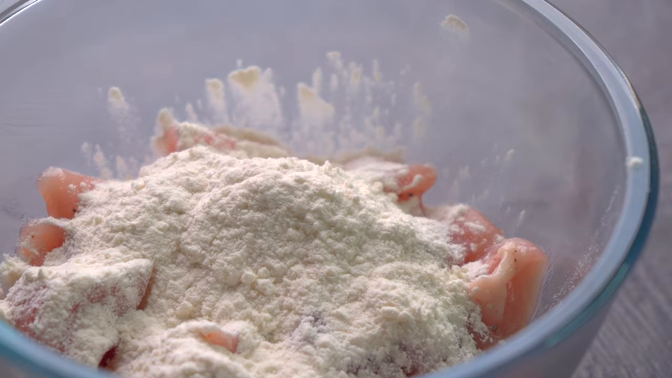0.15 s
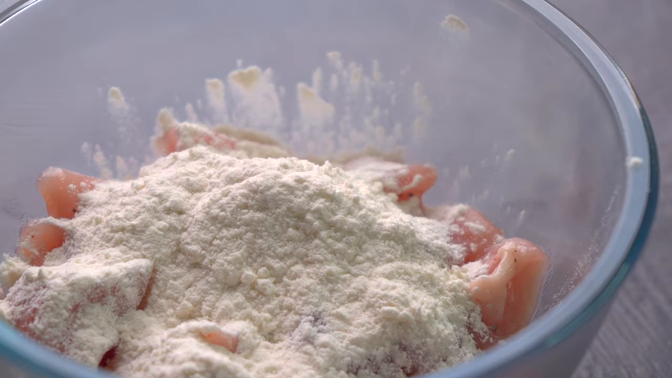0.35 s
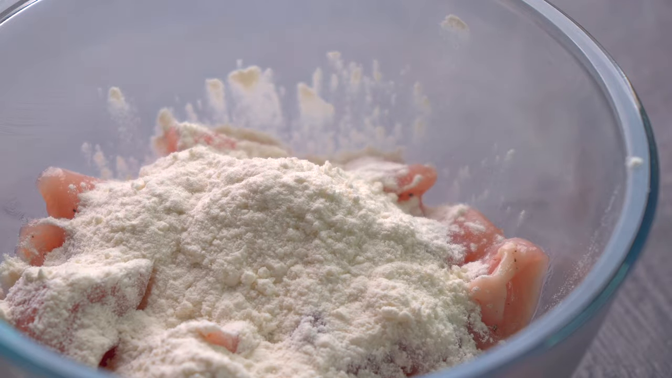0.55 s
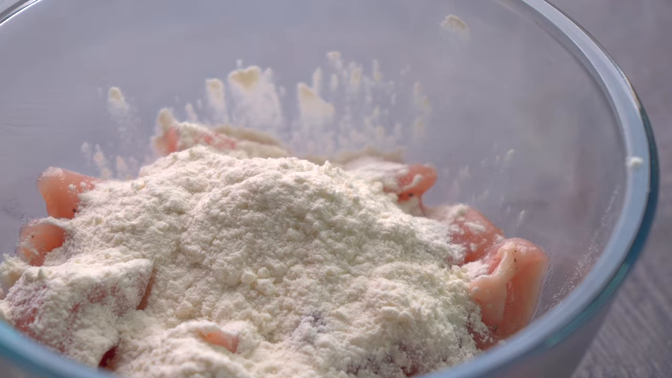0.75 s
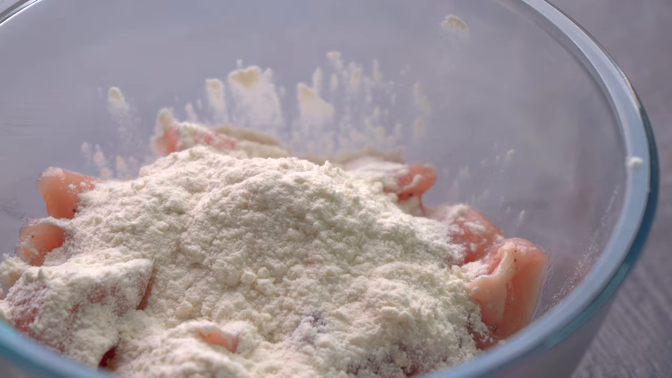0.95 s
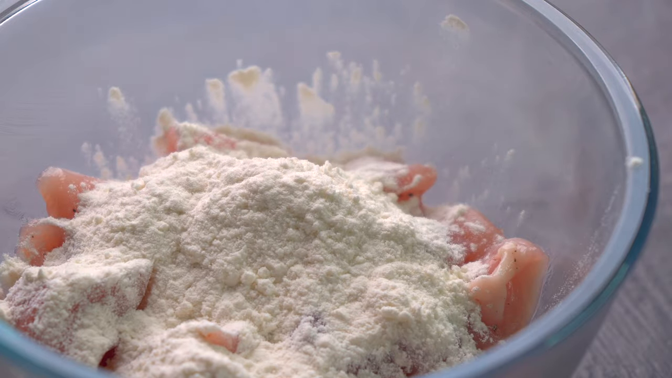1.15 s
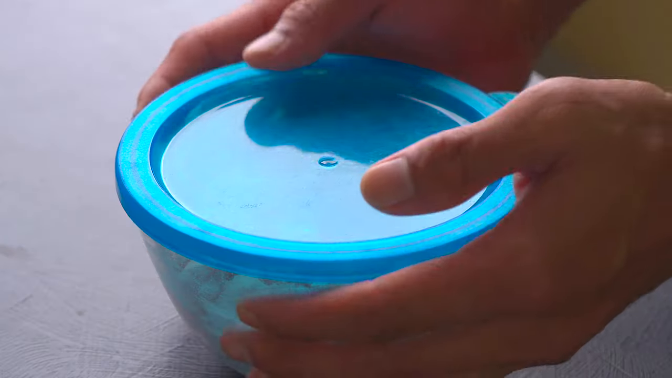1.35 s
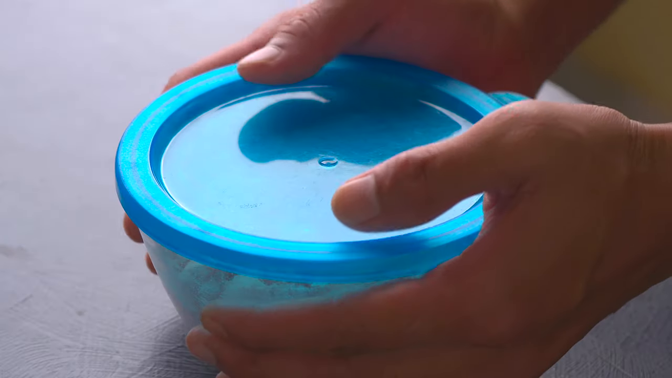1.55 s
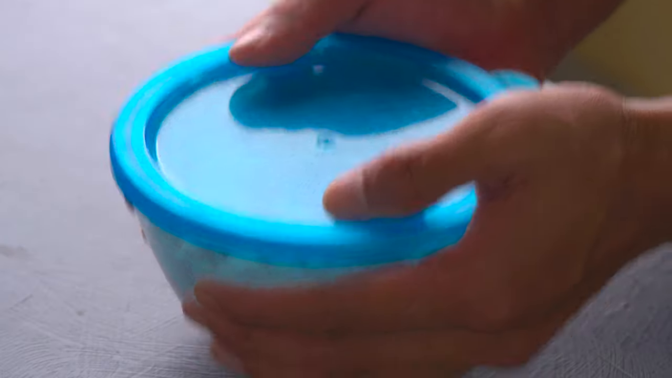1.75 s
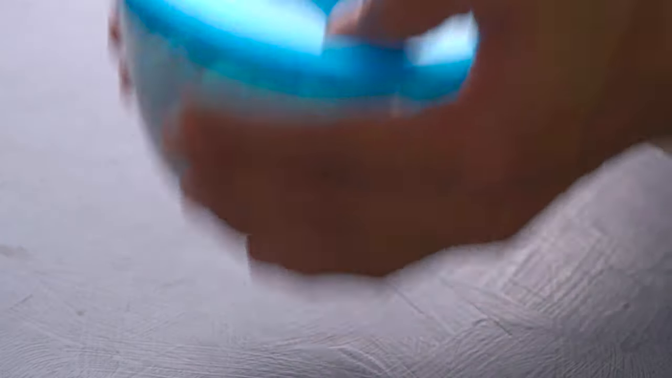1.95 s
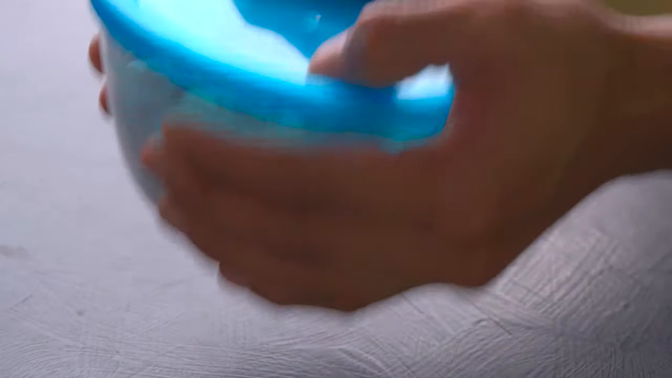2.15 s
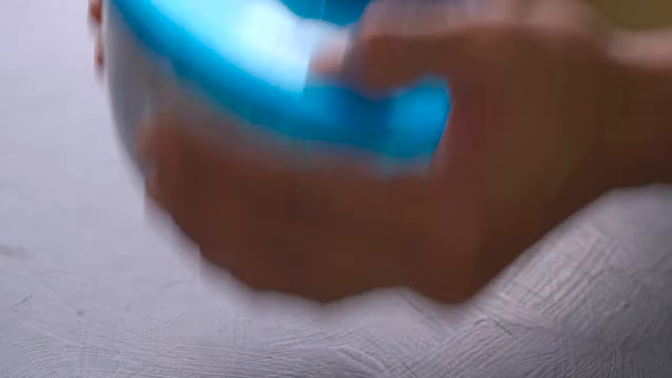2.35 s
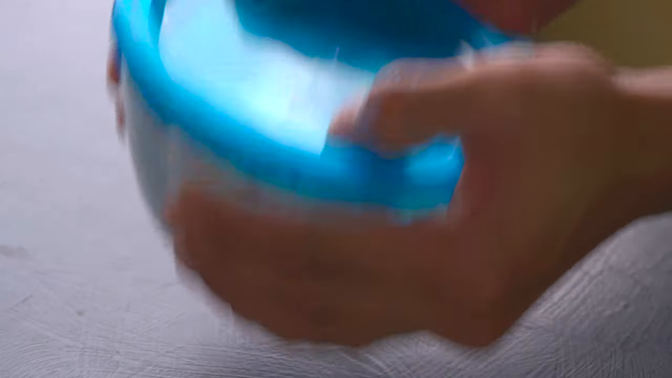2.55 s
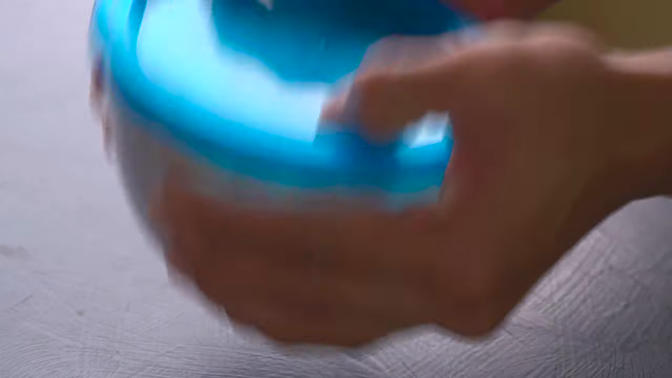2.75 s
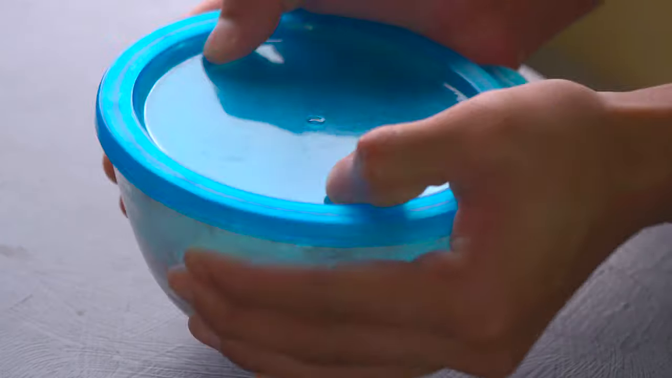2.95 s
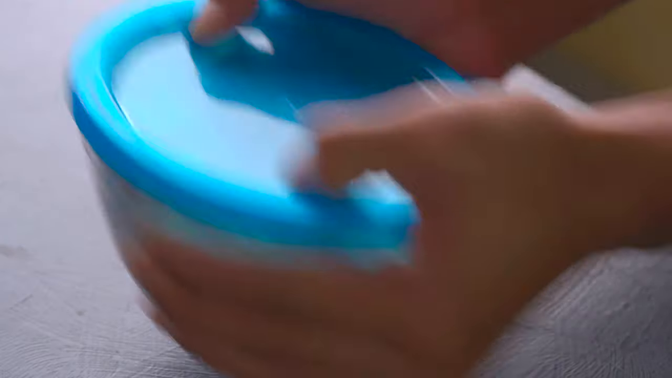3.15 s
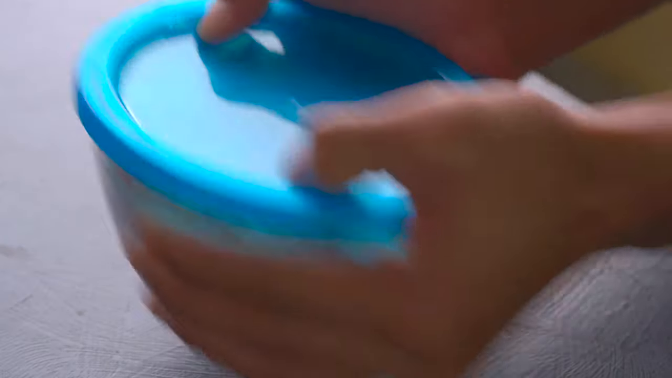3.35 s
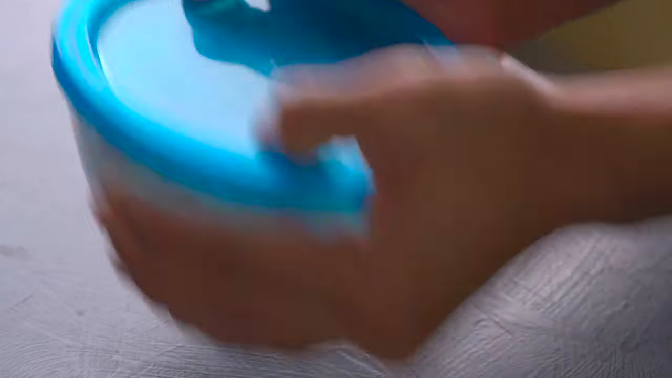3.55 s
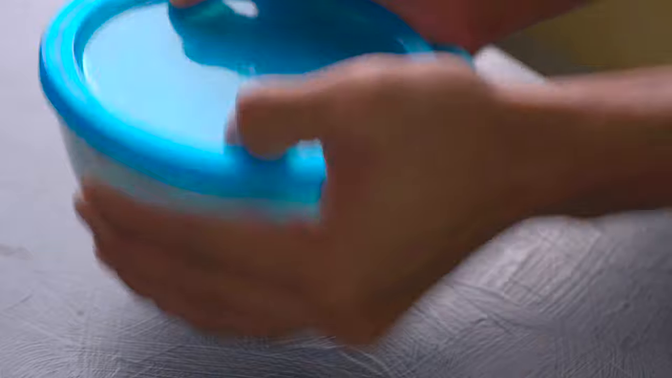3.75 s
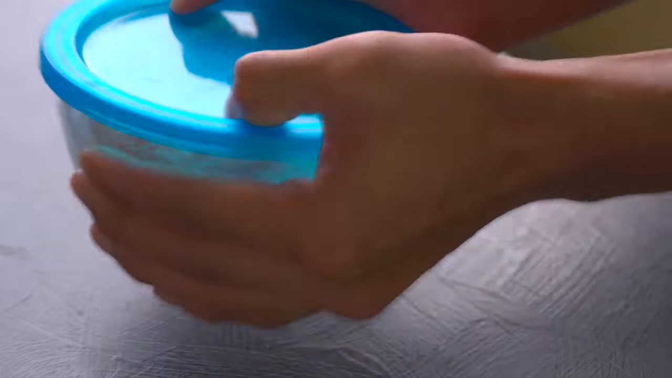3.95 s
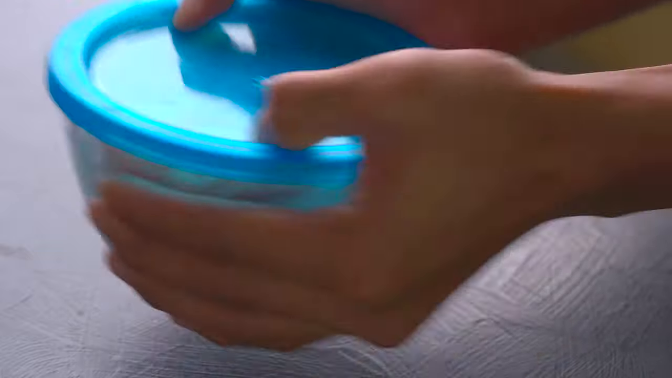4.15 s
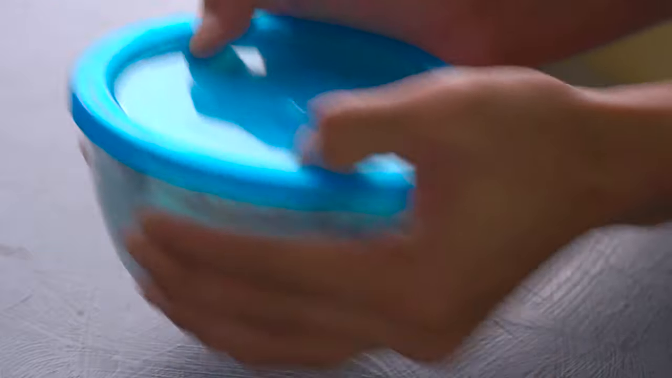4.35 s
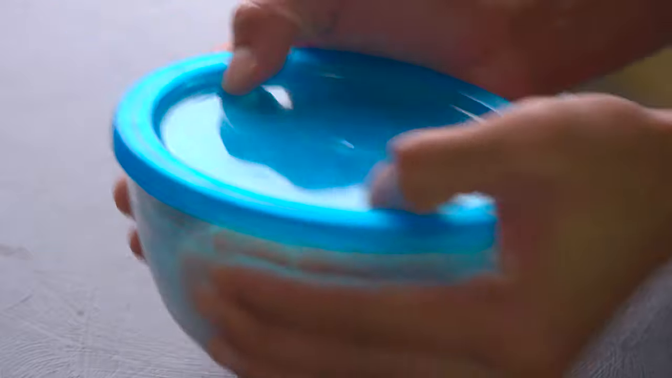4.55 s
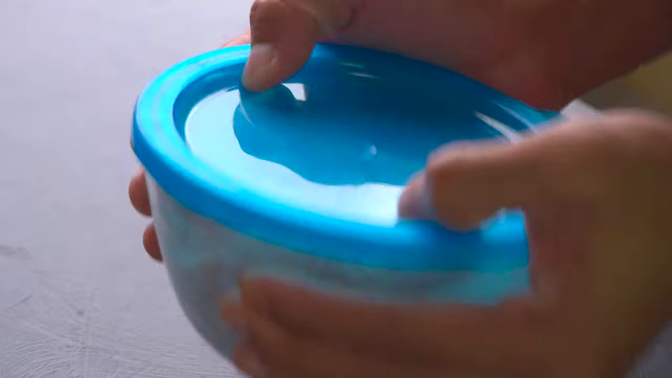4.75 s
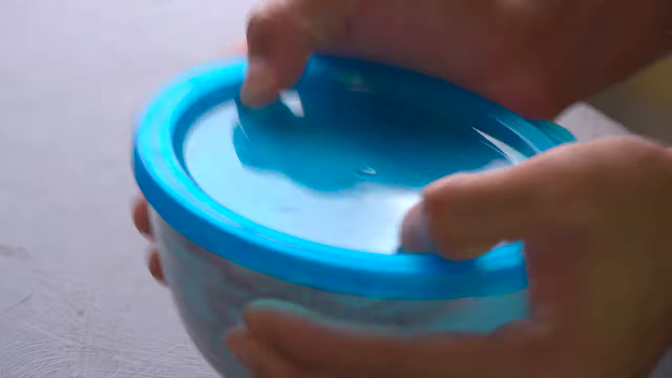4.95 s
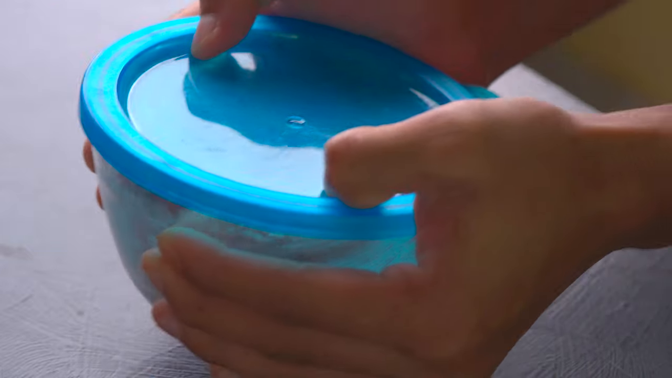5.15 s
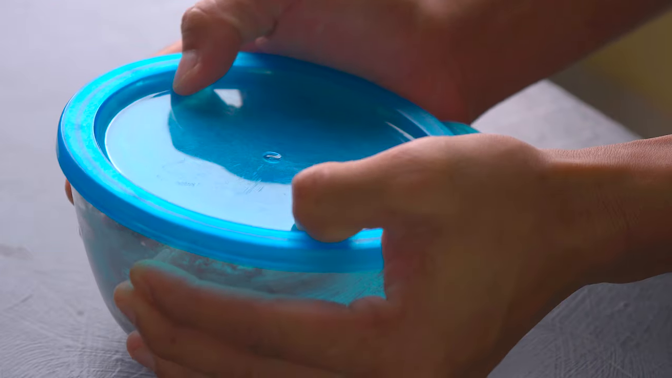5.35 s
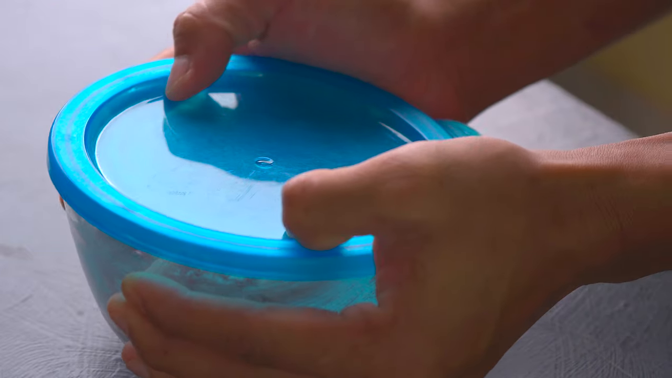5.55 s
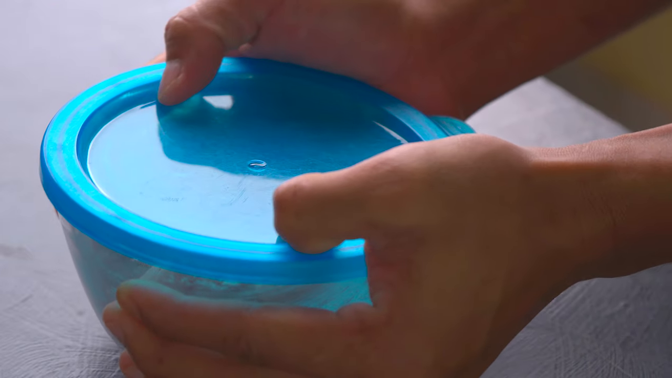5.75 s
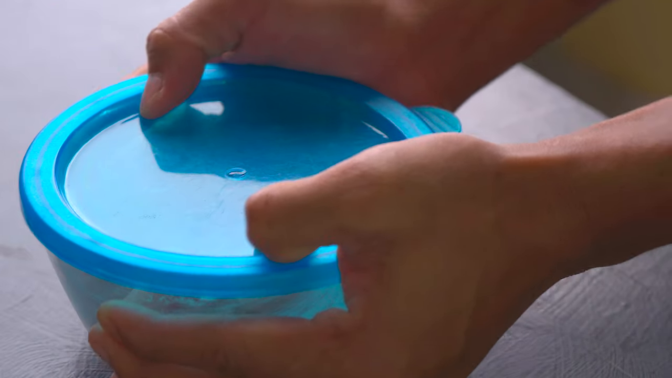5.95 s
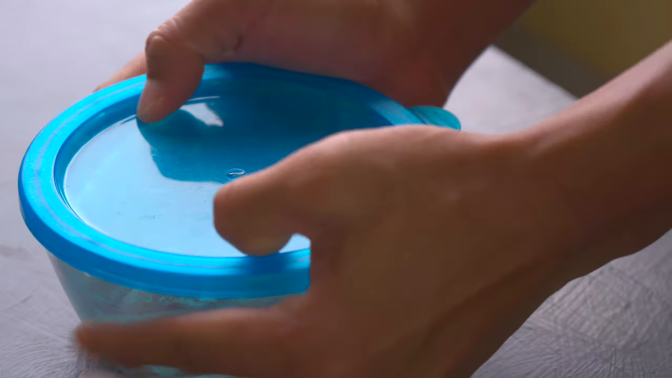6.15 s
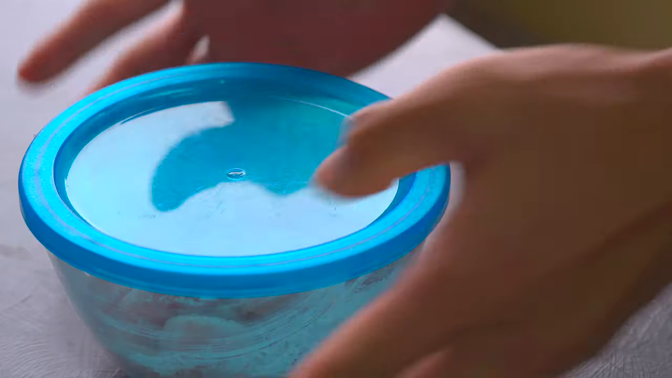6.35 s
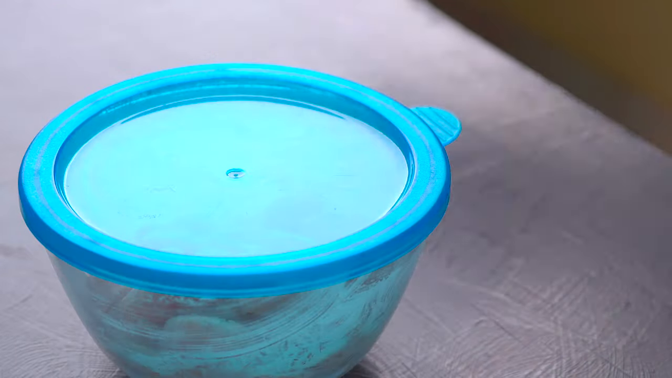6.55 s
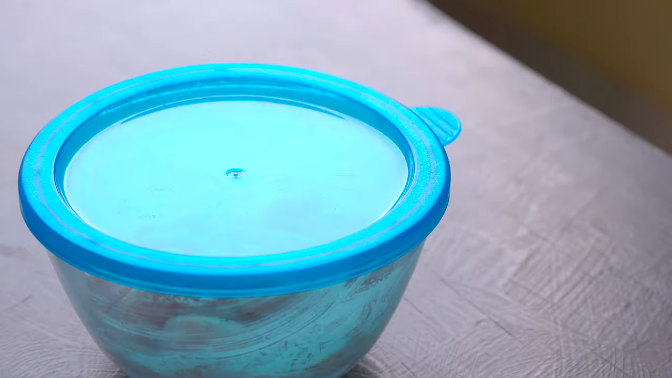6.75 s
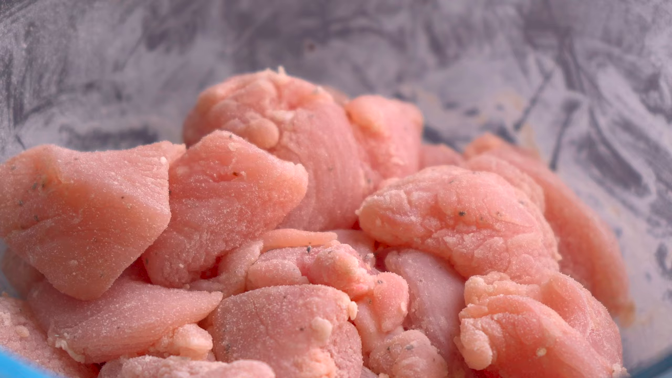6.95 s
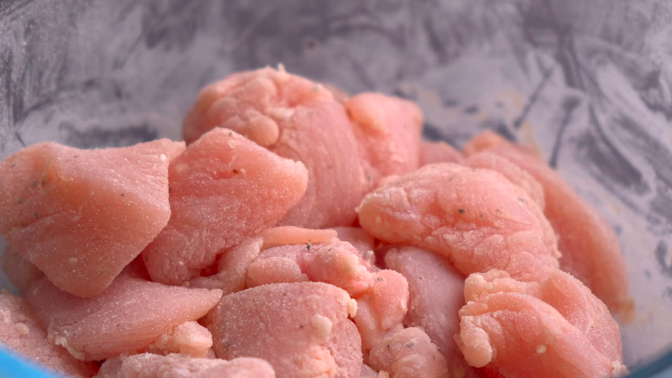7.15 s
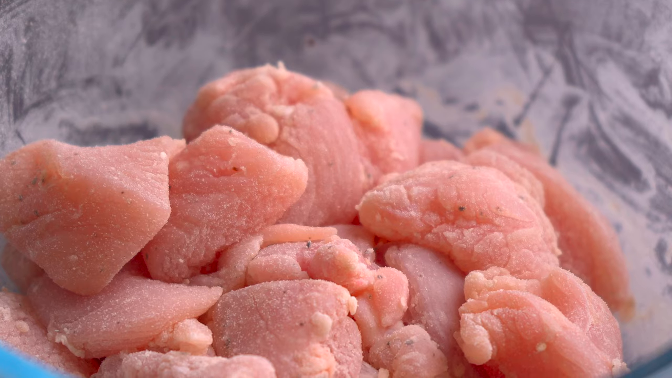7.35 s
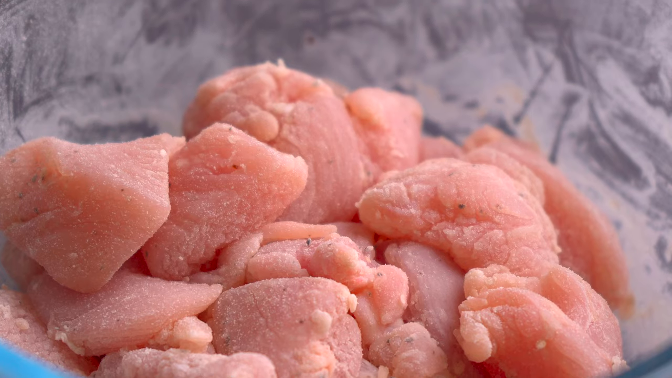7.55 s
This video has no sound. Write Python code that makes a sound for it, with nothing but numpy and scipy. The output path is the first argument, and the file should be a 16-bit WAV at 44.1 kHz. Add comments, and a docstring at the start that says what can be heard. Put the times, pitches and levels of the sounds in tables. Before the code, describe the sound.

Close, fairly dry kitchen sound with a short diffuse tail. For the first 1.3 seconds there is only low, soft rumble and a faint tick near 0.15. Hands scuff lightly at 1.4, and a small clicky knock at 1.7 marks the bowl being lifted. From about 2.0 to 2.95 floured meat is shaken fast in a lidded glass bowl: irregular hollow thumps of the taut lid, dull glass, wet slaps and rustling flour, densest after 2.4. A lull follows, with soft rubbing. From 3.4 to 5.0 a second, longer bout drums at roughly nine strokes a second, with very faint high airy puffs. The bowl taps the table at 5.4, with tiny contacts until 5.7. At 6.03 a loud, sharp double knock lands with woody body. Hands rustle and slide off, a small tick sounds at 6.74, then quiet rumble remains to the end.

```python
"""Low kitchen rumble and a faint tick; then floured raw chicken is shaken in a lidded glass bowl, set down on a
table. Each landing thumps the taut lid, its two modes beating, and the bowl's mass (decaying sines) and rings
the damped glass; wet slaps crack (noise bursts), flour and hands rustle (roughened hiss), air whistles at the
vent (narrow noise). The bowl foot knocks the table (modal ring, clack, rumble). A short diffuse tail follows
bowl, slaps and table."""
import sys
import numpy as np
from scipy import signal
from scipy.fft import rfft, irfft
from scipy.io import wavfile
from scipy.ndimage import uniform_filter1d

SR = 44100
rng = np.random.default_rng(int(sys.argv[2]) if len(sys.argv) > 2 else 0)


def digitize_waveform(pressure):
    """Quantize a signal to 16-bit integers and store it at the path in sys.argv[1].

    Rows of a 2-D input are taken as channels; values are limited to [-1, 1].
    """
    field = np.atleast_2d(pressure).T
    bounded = np.clip(field, -1, 1)
    quanta = np.round(bounded * 32767).astype(np.int16)
    wavfile.write(sys.argv[1], SR, quanta)


N = 335027

# pieces landing: start_s, lid_level_db (rms), boom_re_lid_db, lid_t60_s (10 ms at least), slap_level_db
THUMPS = [(2.036, -31, -34, 0.083, -41.5), (2.088, -36, -35, 0.13, -50), (2.225, -29, 0, 0.036, -40.5),
          (2.297, -31.5, -30, 0.071, -43), (2.392, -17.5, -4, 0.019, -32),
          (2.401, -36, 17.5, 0.0094, -45.5), (2.409, -27, -17, .018, -32),
          (2.437, -15.5, -29, 0.0041, -32.5), (2.478, -35, -23, 0.057, -56), (2.582, -33, -13, 0.086, -50),
          (2.596, -15, 1.5, 0.013, -27.5), (2.63, -35, 9, .024, -41), (2.666, -29.5, -14, 0.09, -38.5),
          (2.778, -16, 1, 0.024, -32), (2.786, -18, 3, 0.0092, -28), (2.79, -29, 19, 0.02, -27.5),
          (2.851, -19.5, -22, 0.16, -35), (2.939, -21, 2.5, 0.022, -32), (2.947, -27, 14.5, 0.12, -36),
          (2.962, -24, 12.5, 0.011, -33), (3.256, -47, -4, 0.21, -84), (3.433, -38.5, -30, 0.026, -48),
          (3.46, -24.5, -27, 0.089, -44.5), (3.558, -42, -8, 0.19, -55.5), (3.638, -26, -10, 0.14, -38),
          (3.735, -23.5, -2, .036, -35), (3.74, -26.5, 14.5, 0.026, -33), (3.851, -23.5, -33, 0.073, -38.5),
          (3.863, -35, -14, 0.046, -44.5), (3.96, -18, -42, 0.047, -31.5), (3.971, -31.5, 6.5, 0.04, -45),
          (4.064, -19.5, -37, 0.052, -31.5), (4.141, -40, -8, .035, -46), (4.176, -15.5, 6.5, 0.057, -26.5),
          (4.195, -44, 4, 0.025, -59), (4.209, -27.5, -7, 0.035, -54), (4.262, -40, 10.5, 0.015, -43),
          (4.296, -31, 2, 0.063, -41), (4.312, -29.5, -19, 0.066, -44), (4.413, -21.5, -27, 0.15, -37),
          (4.441, -29, -26, 0.052, -47.5), (4.526, -13.5, -2, 0.031, -29), (4.544, -50, 6, .01, -66),
          (4.631, -18.5, -40, 0.052, -36.5), (4.743, -23.5, -33, 0.014, -32),
          (4.751, -17.5, -5, 0.015, -39), (4.765, -35, 8.5, 0.13, -50.5), (4.858, -15, -2, 0.031, -32.5),
          (4.885, -27.5, -20, 0.054, -64), (4.972, -27, -31, 0.076, -37), (4.986, -26, -32, 0.011, -48.5)]
# hands and bowl mass, damped by the palms: nominal_hz, level_db, t60_s
BOOM_MODES = [(225, -3, .03), (190, -3, .035), (135, -11, .05)]
# damped glass: nominal_hz, level_db, t60_s
WALL_MODES = [(1144, 0, 0.014), (945, -14, 0.06), (1296, -3, 0.014), (1614, -3, 0.013), (2415, -7, 0.012),
              (577, -5, 0.015)]
# slaps and ticks that leave the lid quiet: start_s, level_db, top_re_level_db (nominal)
LONE_SLAPS = [(0.151, -49.5, -9.5), (1.418, -49, -20), (1.713, -32.5, 1), (1.73, -27, -2.5),
              (1.737, -35, -12), (1.949, -50, -10), (2.286, -44.5, -9), (2.845, -43, 0), (2.953, -35, -6),
              (3.436, -52, -18), (3.621, -37, -14), (3.71, -44, -6), (3.819, -40, -19), (3.832, -52, -12),
              (3.845, -46, 7), (4.039, -34.5, -17), (4.048, -46, -8), (4.07, -32, -6.5), (4.257, -42, -8),
              (4.266, -34, -20), (4.387, -38.5, -4), (4.528, -46.5, 14), (4.841, -38, -15),
              (4.854, -32, -2.5), (4.944, -50, -10), (6.025, -19, -3), (6.032, -29, -19),
              (6.048, -32, -11.5), (6.218, -42.5, -3), (6.742, -36.5, -18)]
# bouts of shaking: start_s, build_up_s, steady_s, dying_away_s, rolling_level_db
BOUTS = [(1.9, 0.55, 0.62, 0.2, -47.5), (3.2, 0.36, 0.71, 1, -45)]
# bowl foot on table: start_s, blow_db, long_panel_mode_db, upper_modes_db, contact_ms
KNOCKS = [(1.7313, -38, -19, 10, 1.73), (5.3844, -22.5, -25.5, 2, 1.44), (5.450, -34, -6.5, 0.5, 1.24),
          (5.63, -46.5, 0, -4, 1.24), (5.656, -41.5, -5, -6, 0.95), (5.69, -40, -5, -7, 2.5),
          (6.0256, -9, -1, -3.5, 1.7), (6.0351, -13.5, 1.5, -3, 2.42), (6.229, -44, -4.5, 5.5, 0.81)]
# table top: mode_hz, level_db, t60_s
TABLE_MODES = [(71, -3.5, 0.1), (128, -20.5, 0.89), (146.5, -23, .3), (190, -34.5, 0.13), (223, 1.5, 0.073),
               (253.8, -11, 0.41), (270.7, -8.5, 0.54), (305.3, -2.5, 0.075), (401, -16, 0.13),
               (365, 2.5, 0.074), (485, 0, 0.052), (535, -5, 0.14), (599.6, -5, 0.081), (835, -9, 0.056),
               (970, -24, 0.023), (1450, -21, .03)]
# hands, cloth and flour rubbing, before and after the bowl is lowered: time_s, level_db, top_re_level_db
RUSTLE_SPANS = [
    [(1.29, -69, -9), (1.6, -68.5, -3.5), (1.74, -52, -21), (1.93, -65.5, -20), (2.1, -59.5, -12),
     (2.2, -88, -6), (2.6, -68, -8), (2.95, -63, -19), (3.06, -61, -8.5), (3.27, -61, -6.5),
     (3.7, -58.5, -7.5), (4.4, -68, -21), (4.7, -69, -17), (5.1, -68.5, -15)],
    [(5.8, -75, -4), (6.1, -54.5, -12), (6.38, -61, -9.5), (6.6, -57, -8), (6.75, -57.5, -5),
     (6.85, -63.5, -8), (7.0, -69.5, -8)],
]
# rubbing colour: freq_hz, density_db (per Hz)
RUB_COLOUR = [(400, 7.5), (900, 5), (1500, 3), (2600, -1), (4800, -7.5), (7000, -17)]
# scuffs of hand on glass, slides of flour: start_s, nominal_length_s, level_db, top_re_level_db
SCUFFS = [(1.41, 0.15, -54.5, -14), (1.78, 0.079, -61, -13), (1.973, 0.054, -53, -10),
          (2.076, 0.013, -60, -6), (2.23, 0.077, -53.5, -10.5), (2.456, 0.051, -55.5, -10),
          (2.639, 0.047, -50.5, -12), (3.004, 0.034, -56.5, -14), (3.116, 0.058, -55.5, -11),
          (3.427, 0.016, -49, -29), (3.576, 0.015, -50, -16), (3.65, 0.035, -55, -16),
          (3.703, 0.023, -50.5, -9.5), (4.37, 0.075, -57, -11), (6.243, 0.1, -57, -6),
          (6.732, 0.082, -49, -19)]
# scuff colour, peaked by the glass wall: freq_hz, density_db (per Hz)
SCUFF_COLOUR = [(500, -5), (820, 2), (1100, -3.5), (1420, 3), (1900, -4), (2400, 1.5), (3300, -9.5),
                (4400, -3.5), (5600, -14), (7000, -10.5)]
# breathy band of a palm sliding off: time_s, level_db
PALM_SLIDE = [(6.36, -84), (6.45, -69), (6.7, -64), (6.76, -74)]
# puffs of air at the vent, one a stroke: middle_s, level_db
VENT_PUFFS = [(3.015, -78), (3.335, -74), (3.48, -75), (3.595, -69), (3.7, -66), (3.8, -68), (3.915, -60),
              (4.03, -60), (4.147, -58), (4.26, -68), (4.37, -57), (4.485, -68), (4.604, -72), (4.704, -71),
              (4.818, -69)]
# kitchen noise colour: freq_hz, density_db (per Hz)
KITCHEN_COLOUR = [(12, -50.5), (20, -16), (65, -7.5), (130, -17), (158, -18), (234, -21.5), (277, -21),
                  (367, -28), (459, -30.5), (698, -33.5), (1060, -37.5), (1570, -41), (16000, -50)]
# background level and bass, held in steps: from_s, level_db, bass_lift_db
BACKGROUND_STEPS = [(0, -58, 2.5), (1.0, -58.5, 7.5), (1.3, -53, 10), (1.4, -54.5, 2), (1.96, -51.5, 7),
                    (2.04, -56, 5), (2.2, -56.5, 8), (2.6, -55, -2), (3.8, -51.5, -9), (4.57, -60.5, -15),
                    (5.1, -56.5, -3.5), (5.33, -63, -9), (5.36, -70, 3), (5.385, -69.5, -6),
                    (5.625, -55.5, 2), (6.0, -54, 0.5), (6.7, -57, -4), (7.0, -65, 5), (7.022, -57, 8),
                    (7.25, -57.5, 4.5)]
# diffuse tail: band_centre_hz, t60_s
ROOM_BANDS = [(150, 0.59), (400, 0.38), (1000, 0.63), (2500, 0.3), (6000, 0.14), (12000, 0.15)]

LID_HZ, LID_SPREAD, CONTACT_MS = 330.4, 0.0466, 4.08  # spread: the lid's pitch shifts with the grip
LID2_HZ, LID2_DB, LID2_T60_S = 292, -11, 0.1  # nominal pitch; a second mode of the lid beats against the first
BOOM_SPREAD, WALL_SPREAD = 0.057, 0.088  # pitch spread per landing, fraction
WALL_RE_SLAP_DB = 2
TOUCH_SPREAD = 0.34  # later touches re the first
SLAP_T60_S, SLAP_TOP_T60_S, SLAP_TOP_DB = 0.018, 0.013, -6.5  # top: nominal, for landings
TUMBLE_RANGE_DB = 20.5  # how far the rolling sinks at both ends of a bout
RATTLE_DB, RATTLE_T60_S = -18, 0.34
SETTLE_DB, SETTLE_TOP_DB, SETTLE_T60_S = -32, -1, 0.24
SLIDE_HZ = 4850
VENT_HZ, VENT_WIDTH_HZ, NOMINAL_PUFF_S = 7970, 200, 0.076
STEP_S = 0.012  # smoothing of the background steps
BOWL_SEND_DB, SLAP_SEND_DB, TABLE_SEND_DB = -21, -12.5, -16.0
TOP_HZ = 16000


def undb(db):
    """Amplitude of a level in dB."""
    return 10 ** (np.asarray(db) / 20)


def unit(x):
    """Scale to rms 1."""
    return x / np.sqrt(np.mean(x ** 2))


def curve(rows):
    """Columns of (s, value, ..) rows at every sample, and a mask of the span with 11 ms edges."""
    s, *columns = np.transpose(rows)
    t = np.arange(N) / SR
    mask = np.clip(np.minimum(t - s[0], s[-1] - t) / 0.011, 0, 1)
    return [np.interp(t, s, c) for c in columns], mask


def noise(points, size=N):
    """Noise of rms 1 with the colour of (Hz, dB) points."""
    hz, db = np.transpose(points)
    f = np.arange(size // 2 + 1) * SR / size + 1
    colour = undb(np.interp(np.log(f), np.log(hz), db, -200, -200))
    return unit(irfft(rfft(rng.standard_normal(size)) * colour, size))


def walk(rate_hz):
    """Random values held 1 / rate_hz s and slewed; rms 1."""
    k = int(SR / rate_hz)
    held = np.repeat(rng.standard_normal(N // k + 1), k)
    return unit(uniform_filter1d(held, k)[:N])


def ring(modes, seconds):
    """Answer of (Hz, dB, t60 s) modes to a click."""
    t = np.arange(int(seconds * SR)) / SR
    return sum(undb(db - 60 * t / max(t60, .005)) * np.sin(2 * np.pi * hz * t) for hz, db, t60 in modes)


def push(ms):
    """A soft contact: one raised-cosine pulse of force, area 1."""
    force = np.hanning(max(int(ms * SR / 1000), 1) + 2)
    return force / force.sum()


def add(track, s, sound):
    """Mix a sound into the track at s seconds."""
    i = int(s * SR)
    track[i:i + len(sound)] += sound[:N - i]


def thumps():
    """Soft meat builds its push over the contact time; pitches of both lid modes, boom and wall vary per
    landing."""
    out = np.zeros(N)
    t = np.arange(int(.3 * SR)) / SR
    late = np.maximum(t - CONTACT_MS / 1000, 0)
    swell = np.sin(np.pi / 2 * np.minimum(t * 1000 / CONTACT_MS, 1))
    chances = rng.standard_normal((len(THUMPS), 10))
    for (s, db, boom_db, t60, slap_db), chance in zip(THUMPS, chances):
        boom = [(f * (1 + BOOM_SPREAD * c), g + boom_db, d) for (f, g, d), c in zip(BOOM_MODES, chance)]
        wall = [(f * (1 + WALL_SPREAD * c), g, d) for (f, g, d), c in zip(WALL_MODES, chance[3:])]
        lid2 = (LID2_HZ * (1 + LID_SPREAD * chance[0]), LID2_DB, LID2_T60_S)
        lid_hz = LID_HZ * (1 + LID_SPREAD * chance[-1])
        lid = undb(-60 * late / max(t60, .01)) * np.sin(2 * np.pi * lid_hz * t)
        add(out, s, -np.sqrt(2) * undb(db) * swell * (lid + ring(boom + [lid2], .3)))
        # the flesh spreads in a few more touches
        touches = TOUCH_SPREAD * rng.standard_normal(256) * (rng.random(256) < .03)
        smear = np.append(push(0.11), touches)
        add(out, s, undb(slap_db + WALL_RE_SLAP_DB) * np.convolve(ring(wall, 0.084), smear))
    return out


def tumble():
    """Small random pushes keep lid and wall sounding; they build, hold and die away with each bout."""
    taps = (rng.random(N) < 160 / SR) * rng.standard_normal(N)  # 160 a second on average
    body = ring([(347.5, -7.5, 0.28), (309.2, -9.5, 0.14), (245, -8.5, 0.063),
                 (420, -1, 0.027), (910, -20, 0.15), (1600, -15, .02)], .3)
    gain = np.zeros(N)
    for s, rise, hold, fall, db in BOUTS:
        low = db - TUMBLE_RANGE_DB
        times = np.cumsum([s, rise, hold, fall])
        (level_db,), mask = curve(list(zip(times, [low, db, db, low])))
        gain += mask * undb(level_db)
    return unit(signal.fftconvolve(taps, body)[:N]) * gain


def slaps():
    """Short bursts of wet crackle, one with every landing and some alone; each has its own colour."""
    out = np.zeros(N)
    t = np.arange(4096) / SR
    attack = np.minimum(t / 0.0013, 1)
    rows = [(row[0], row[-1], SLAP_TOP_DB) for row in THUMPS] + LONE_SLAPS
    colours_db = 2.0 * rng.standard_normal((len(rows), 5))
    for (s, db, top_db), c in zip(rows, colours_db):
        body = noise([(700, 6.5), (1500, c[0]), (2600, c[1]), (4000, -5 + c[2]),
                      (6000, -9 + c[3]), (7000, -26)], size=4096)
        top = noise([(5000, -3), (6500, 0), (10000, -5.0), (16000, -15)], size=4096)
        # wet film tears in steps
        tears = uniform_filter1d(np.repeat(rng.standard_normal(64), 64), 32)
        body = undb(-60 * t / SLAP_T60_S) * body
        top = undb(top_db + c[4] - 60 * t / SLAP_TOP_T60_S) * top
        add(out, s, undb(1.74 * tears) * attack * undb(db) * (body + top))
    return out


def knocks():
    """The foot strikes the table: shorter contact is brighter; a dry clack and loose-part rumble ride along."""
    out = np.zeros(N)
    t = np.arange(4096) / SR
    rumble_t = np.arange(16384) / SR
    for s, db, low_db, high_db, ms in KNOCKS:
        # mode 1 is the long panel mode
        modes = [(f, g + (low_db if k == 1 else high_db if f > 330 else 0), d)
                 for k, (f, g, d) in enumerate(TABLE_MODES)]
        add(out, s, -undb(db) * np.convolve(ring(modes, 0.65), push(ms)))
        rumble = noise([(90, -11), (200, 0.5), (500, -4.5), (1000, -22.5), (2500, -25.5)], size=16384)
        add(out, s, undb(db + RATTLE_DB - 60 * rumble_t / RATTLE_T60_S) * rumble)
        clack = noise([(500, -6), (900, 8.5), (1600, 1), (3000, -9.5), (7000, -26)], size=4096)
        add(out, s, undb(db + high_db - 16.5 - 60 * t / 0.062) / ms ** 2 * clack)
    return out


def rustle():
    """Rubbing: dense tiny slips roughen a hiss; fine dust adds the top; scuffs take the glass wall's peaks."""
    bursts = np.repeat(rng.exponential(size=N // 64 + 1), 64)[:N]
    slips = undb(0.34 * bursts + 1.93 * walk(30))
    rub, scrape = unit(slips * noise(RUB_COLOUR)), unit(slips * noise(SCUFF_COLOUR))
    dust = unit(slips * noise([(4000, -3.5), (5500, -2.5), (9000, -4.0), (16000, -17.5)]))
    out = np.zeros(N)
    for rows in RUSTLE_SPANS:
        (db, top_db), mask = curve(rows)
        out += mask * undb(db) * (rub + undb(top_db) * dust)

    # flour thrown up by each landing trickles back; powers add
    power = np.zeros(N)
    decay_db = -60 * np.arange(16384) / SR / SETTLE_T60_S
    for row in THUMPS:
        add(power, row[0], undb(2 * (row[-1] + SETTLE_DB + decay_db)))
    out += np.sqrt(power) * (rub + undb(SETTLE_TOP_DB) * dust)

    (db,), mask = curve(PALM_SLIDE)
    out += mask * undb(db) * noise([(0.7 * SLIDE_HZ, -12), (SLIDE_HZ, 0), (1.34 * SLIDE_HZ, -12)])

    for s, length, db, top_db in SCUFFS:
        u = np.linspace(0, 1.3, int(1.13 * length * SR))
        shape = np.clip(np.minimum(u / 0.23, (1.3 - u) / 0.59), 0, 1)  # quick grip, slower release
        i = int(s * SR)
        add(out, s, undb(db) * shape * (scrape + undb(top_db) * dust)[i:i + len(shape)])
    return out


def vent():
    """A narrow, breathy whistle each time the flexing lid pumps air through its hole."""
    flow = np.zeros(N)
    for (s, db), c in zip(VENT_PUFFS, rng.random(len(VENT_PUFFS))):
        length_s = NOMINAL_PUFF_S * (0.51 + .6 * c)
        add(flow, s - length_s / 2, undb(db) * np.hanning(int(length_s * SR)))
    edge_hz = 3 * VENT_WIDTH_HZ
    breath = noise([(VENT_HZ - edge_hz, -20), (VENT_HZ, 0), (VENT_HZ + edge_hz, -20)])
    return flow * undb(3.7 * walk(70)) * breath


def radiate(x, hz):
    """A small body moves little air at low pitch: high-pass."""
    return signal.sosfilt(signal.butter(2, hz, "high", fs=SR, output="sos"), x)


def room(x):
    """Diffuse tail: white noise shared out into bands that each die at their own rate."""
    t = np.arange(32768) / SR
    white = rfft(rng.standard_normal(32768))
    log_hz = np.log(np.arange(16385) * SR / 32768 + 1)
    centres = np.log(np.array(ROOM_BANDS)[:, 0])
    tail = sum(irfft(white * np.interp(log_hz, centres, pick)) * undb(-60 * t / t60)
               for pick, (_, t60) in zip(np.eye(len(ROOM_BANDS)), ROOM_BANDS))
    tail = tail * np.clip(t / 0.0009, 0, 1)
    return signal.fftconvolve(x, tail / np.sqrt(np.sum(tail ** 2) / 2))[:N]  # tail energy 2


def kitchen():
    """Background hiss over a wavering rumble; level and bass move in smoothed steps."""
    s, *held = np.transpose(BACKGROUND_STEPS)
    row = np.maximum(np.searchsorted(s, np.arange(N) / SR, side="right") - 1, 0)
    db, bass_db = (uniform_filter1d(c[row], int(STEP_S * SR)) for c in held)
    floor = noise(KITCHEN_COLOUR)
    bass = signal.sosfilt(signal.butter(2, 110, fs=SR, output="sos"), floor)
    bass_gain = undb(bass_db + 0.54 * walk(16.0)) - 1
    return undb(db) * (floor + bass_gain * bass)


def scene():
    """Sum bowl, slaps, table and their shared tail with rustle, vent and kitchen."""
    bowl = radiate(thumps() + tumble(), 116)
    cracks = slaps()
    table = radiate(knocks(), 76)
    wet = room(undb(BOWL_SEND_DB) * bowl + undb(SLAP_SEND_DB) * cracks + undb(TABLE_SEND_DB) * table)
    return (bowl + cracks + table + wet + rustle() + vent() + kitchen())[None]


def record(dry):
    """Cut the top steeply above TOP_HZ."""
    return signal.sosfilt(signal.ellip(10, .2, 70, TOP_HZ, fs=SR, output="sos"), dry)


dry = scene()
out = record(dry)
digitize_waveform(out)
```